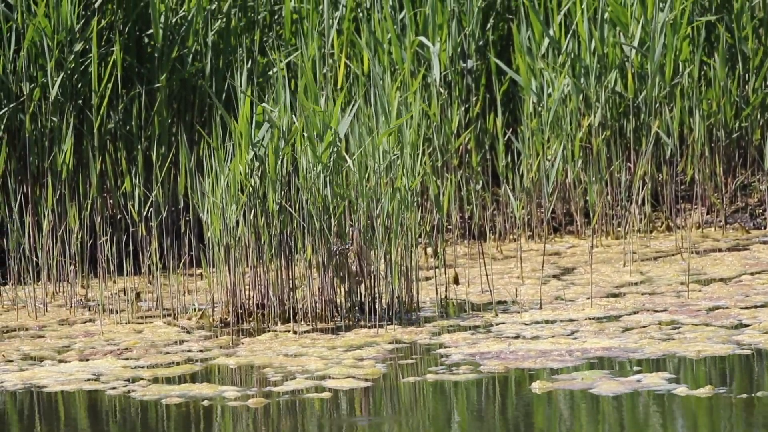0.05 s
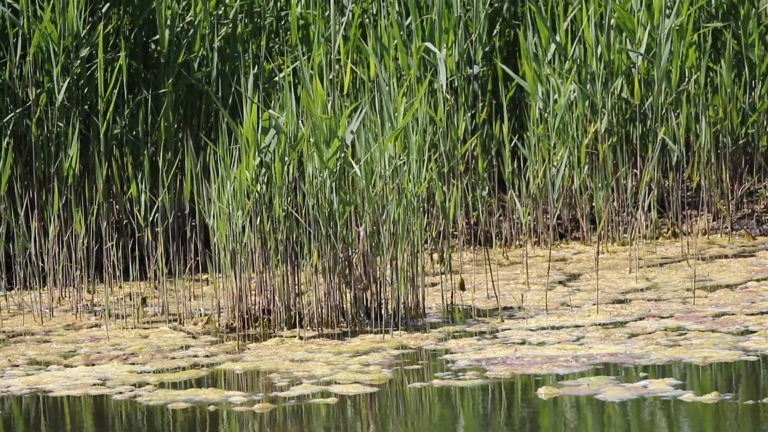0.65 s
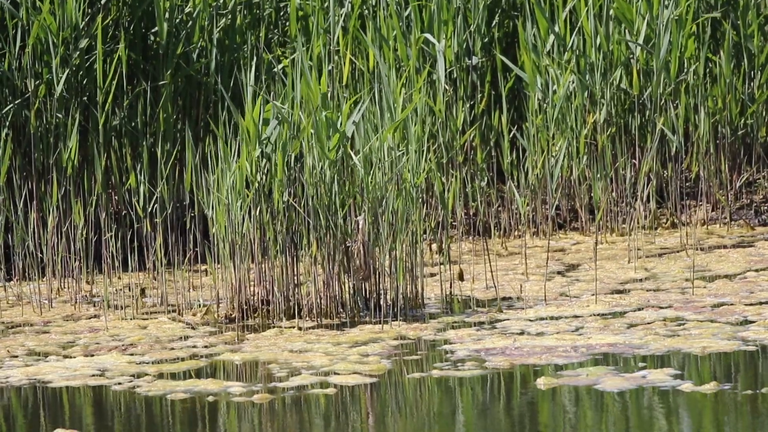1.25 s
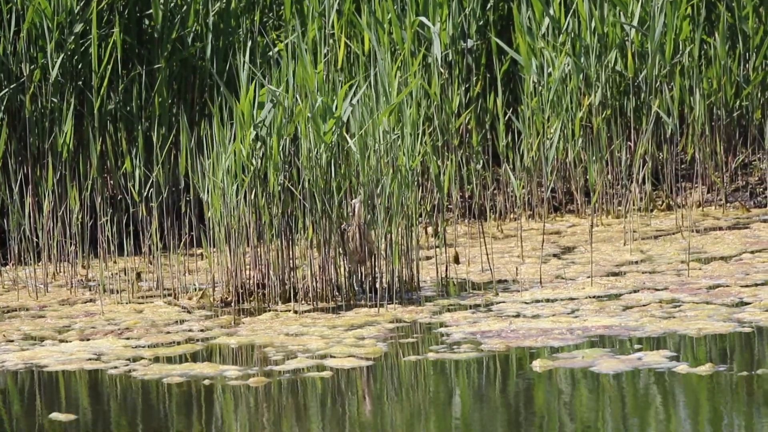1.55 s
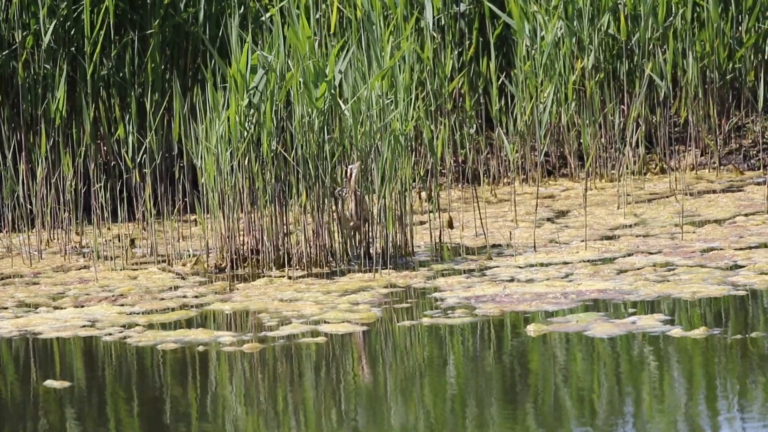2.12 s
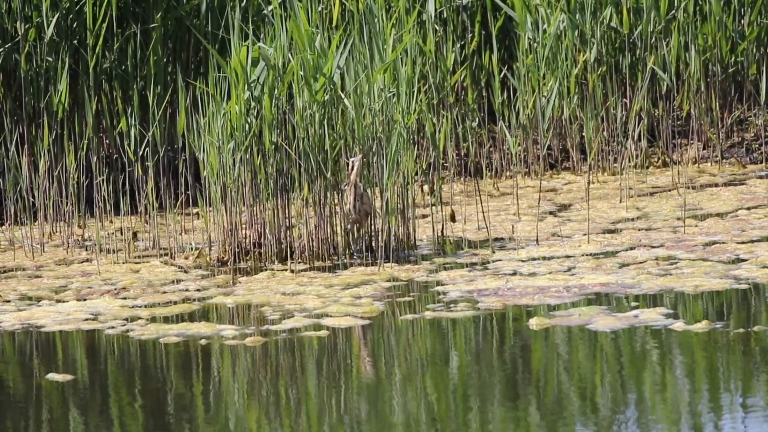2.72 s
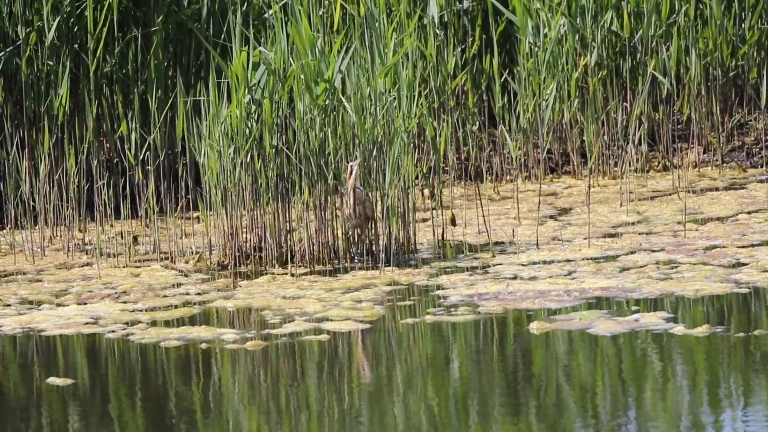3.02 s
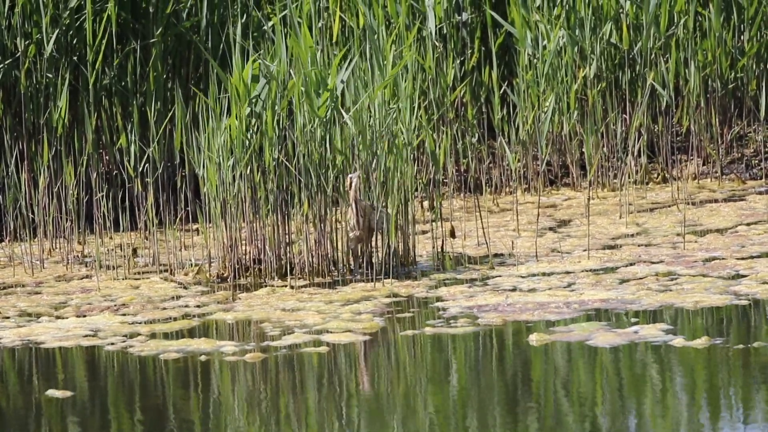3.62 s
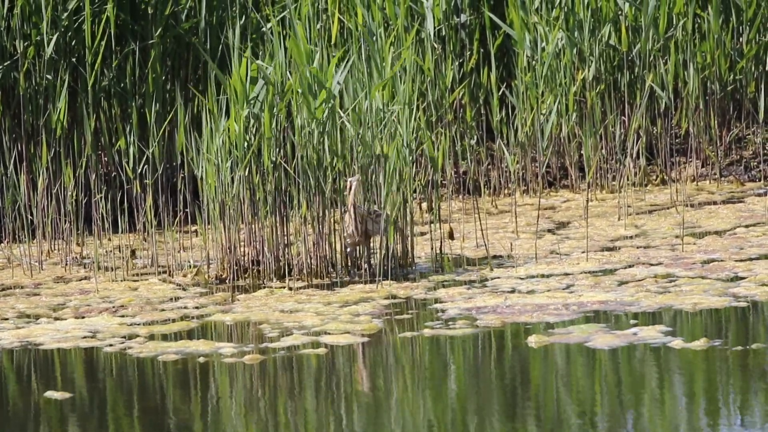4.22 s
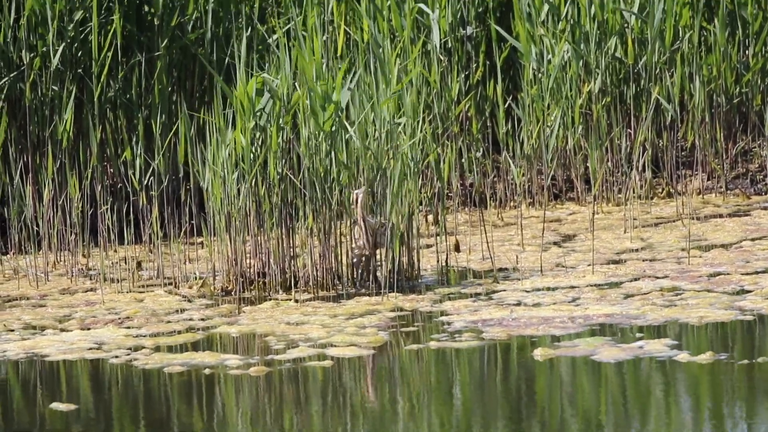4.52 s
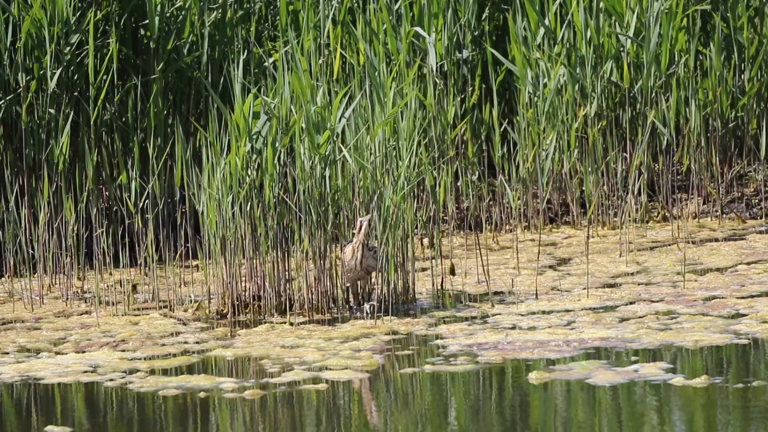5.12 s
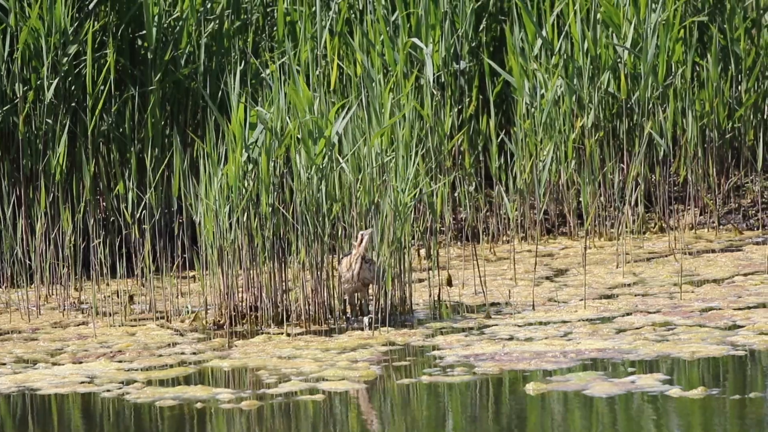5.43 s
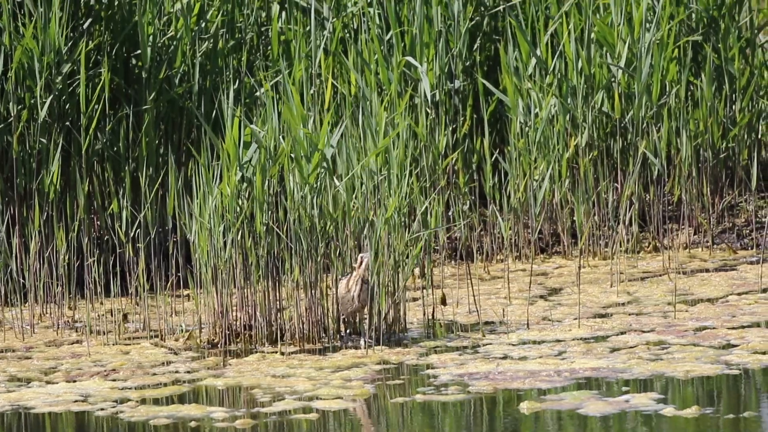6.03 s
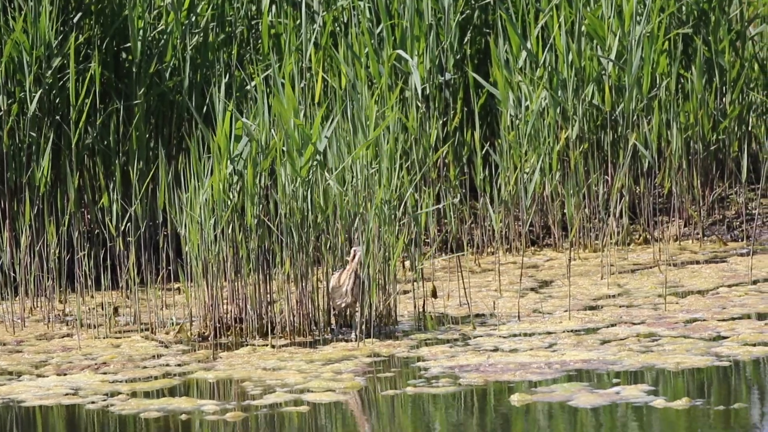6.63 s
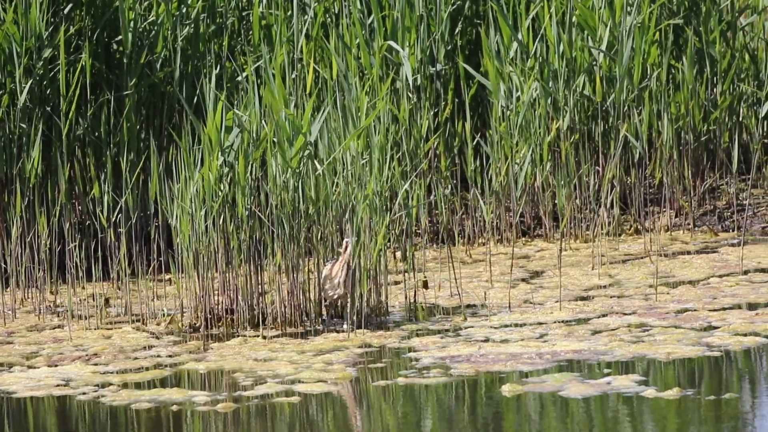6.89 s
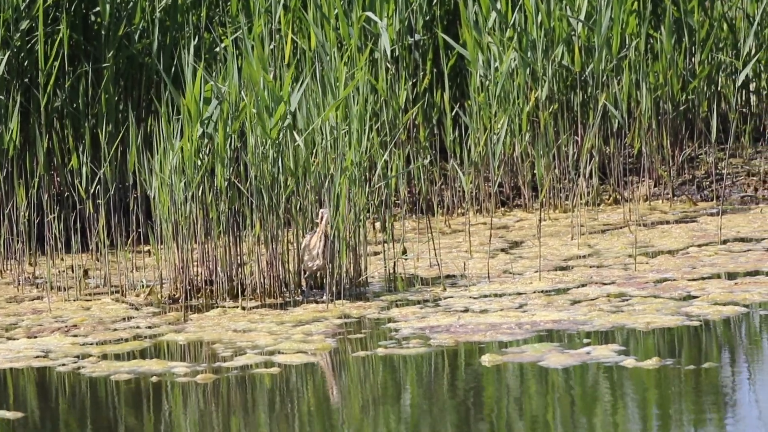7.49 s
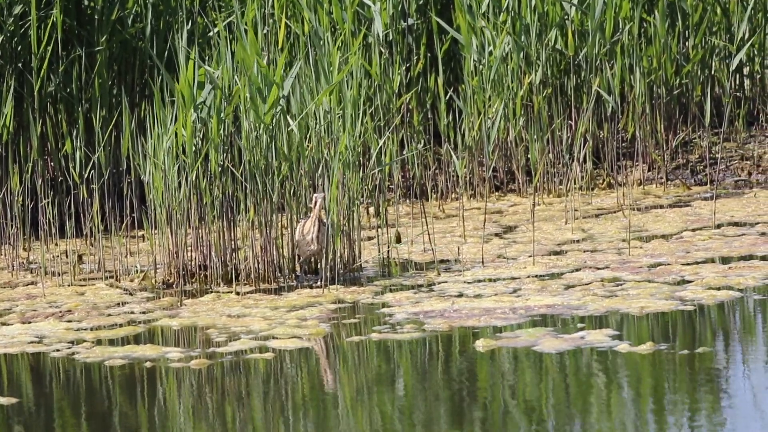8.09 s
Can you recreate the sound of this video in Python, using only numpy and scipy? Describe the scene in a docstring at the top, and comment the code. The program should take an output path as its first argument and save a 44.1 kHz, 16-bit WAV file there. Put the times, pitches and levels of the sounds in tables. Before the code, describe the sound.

Beside a reedy pond, wind rumbles and thumps on a hand-held microphone, with a few light ticks from the grip at the start. Small birds chirp, whistle and trill faintly from the reeds, one nearer bird repeating a high, falling slur. The gusts peak around three seconds, then come in shorter puffs. A calmer stretch leaves sharp chips and distant pips over soft hiss before a last fluttering breeze.

```python
"""Beside a reedy pond, on one hand-held camera microphone: a soft rush of air and far, scratchy chatter.
At once gusts rumble across the microphone port and the camera body ticks in the grip. A warbler's
flourish, thin whistles and trills carry from the reeds; from 1 s a nearer bird slurs with both sides
of its syrinx. A see-saw call and a twitter lead to the hardest gust, near 3 s. The grip creaks again
just after 4 s; then come two sharp chips, far pips and, from 7.3 s, a last breeze in even puffs."""
import sys
import numpy as np
from scipy import signal
from scipy.fft import rfft, irfft, next_fast_len
from scipy.io import wavfile
from scipy.ndimage import uniform_filter1d, map_coordinates

SR = 44100
rng = np.random.default_rng(int(sys.argv[2]) if len(sys.argv) > 2 else 0)


def pcm_store(signal):
    """Save signal as 16-bit PCM."""
    levels = np.round(np.clip(np.atleast_2d(signal), -1, 1) * 32767)
    wavfile.write(sys.argv[1], SR, levels.astype(np.int16).T)


N = 368235


def amp(db):
    """Decibels to gain."""
    return 10 ** (np.asarray(db) / 20)


def unit(x):
    """Scale to rms 1."""
    return x / np.sqrt(np.mean(x ** 2) + 1e-20)


def wobble(rate, size=N):
    """A smooth random curve, rate knots a second."""
    knots = rng.standard_normal(int(size * rate / SR) + 4)
    return map_coordinates(knots, [np.arange(size) * rate / SR])


def filtered(x, response):
    """Filter x by a response given as a function of frequency."""
    size = next_fast_len(N + SR // 2)
    return irfft(rfft(x, size) * response(np.fft.rfftfreq(size, 1 / SR)), size)[:N]


def coloured(x, spectrum):
    """Shape x by (frequency [Hz], gain [dB]) points on a log axis."""
    points_hz, db = np.transpose(spectrum)
    return filtered(x, lambda hz: amp(np.interp(np.log(hz + 1), np.log(points_hz), db)))


def add(track, s, sound):
    """Mix a sound into the track at time s."""
    part = track[max(round(s * SR), 0):][:len(sound)]
    part += sound[:len(part)]


def tone(hz):
    """A sine that follows a pitch curve."""
    return np.sin(2 * np.pi * np.cumsum(hz) / SR)


def arch(u, order):
    """Swell and fade of a note as u runs from 0 to 1; low orders are fuller."""
    return np.abs(np.sin(np.pi * u)) ** order


def swells(rows, rise_s, fall_s):
    """Gain of (time [s], length [s], level [dB]) events that rise, hold and die; they add in power."""
    t, power = np.arange(N) / SR, np.zeros(N)
    for s, length, db in rows:
        fade = np.maximum(s - t, 0) / rise_s + np.maximum(t - s - length, 0) / fall_s
        power += (amp(db) * np.exp(-fade)) ** 2
    return np.sqrt(power)


# the open air over the pond: (frequency [Hz], gain [dB])
AIR_SPECTRUM = [(20, -5), (64, 2), (150, -3), (560, -0.5), (680, -4.5), (1000, -4), (1200, -9), (1400, -5),
                (1600, -10), (2500, -11), (3600, -14), (5200, -18), (7900, -15), (15500, -27.5)]
def air(level_db=-52.5):
    """Distant, steady rush and hiss."""
    return amp(level_db) * unit(coloured(rng.standard_normal(N), AIR_SPECTRUM))


# bouts of a warbler far off in the reeds: (time [s], length [s], level [dB])
SONG_BOUTS = [(0, 0.63, -59), (.8, 0.21, -61), (1.15, 0.17, -62.5), (3.45, 1.5, -65), (5.07, 0.42, -59),
              (5.7, .27, -61.5), (6.1, 0.15, -60.5), (8.08, 0.3, -65)]
def chatter(centre_hz=3050, spread=0.15, slide=0.1125, rasp_hz=220, edge_s=0.02, between_db=-70,
            count=220):
    """Far off, quick scratchy syllables run into one another, louder in bouts."""
    out, u = np.zeros(N), np.linspace(0, 1, SR // 20)
    for s, (height, slope) in zip(np.linspace(0, N / SR, count), rng.standard_normal((count, 2))):
        glide_hz = centre_hz * np.exp(spread * height + slide * slope * (u - .5))
        hz = glide_hz + rasp_hz * wobble(396.7, len(u))
        add(out, s + rng.uniform(0, .04), arch(u, order=1) * tone(hz))
    return np.hypot(swells(SONG_BOUTS, edge_s, edge_s), amp(between_db)) * unit(out)


GUST_RISE_S, GUST_FALL_S, CALM_DB = .016, .028, -60  # time constants; the breeze between gusts
# rumble at the port in a moderate gust: (frequency [Hz], gain [dB])
RUMBLE_SPECTRUM = [(15, -19), (60, 1), (110, 2.5), (175, -1.5), (250, -12), (350, -21.5), (500, -24.5),
                   (800, -55), (1300, -68)]
# gusts right on the microphone: (time [s], length [s], level [dB])
MIC_GUSTS = [(0.02, 0.57, -26), (.6, .31, -22), (1.02, 0.033, -26.5), (1.18, 0.34, -33.5), (1.73, 1.0, -25),
             (1.92, 0.12, -19), (2.26, .22, -20.5), (2.75, 0.39, -18), (3.18, 0.097, -26.5),
             (3.43, 0.072, -30), (3.69, 0.095, -39), (4.04, 0.4, -40.5), (4.22, 0.036, -24),
             (4.6, 0.043, -26.5), (4.73, 0.29, -33), (5.5, 0.083, -36.5), (6.5, 0.48, -52.5),
             (6.97, .28, -41), (8.07, 0.082, -28)]
def wind(level_db=0.5, moderate_db=-22.5, hurry=.24, puff_db=10.5, flutter_start_s=7.33,
         flutter_gap_s=.095, flutter_s=.02, flutter_db=-33, flutter_edge_s=.008, count=11):
    """Eddies sweep past the port in puffs: the faster the air, the louder and higher it rumbles."""
    puffs_db = puff_db * np.tanh(.5 * wobble(32) + .3 * wobble(110))  # puffs within a gust
    flutter = [(flutter_start_s + k * flutter_gap_s - flutter_s / 2, flutter_s, flutter_db)
               for k in range(count)]  # the even puffs of the last breeze
    gusts = swells(MIC_GUSTS, GUST_RISE_S, GUST_FALL_S)
    force = np.hypot(gusts, swells(flutter, flutter_edge_s, flutter_edge_s))
    force_db = 20 * np.log10(force + amp(CALM_DB))
    speed = amp(hurry * (force_db + puffs_db - moderate_db))
    eddies = unit(coloured(rng.standard_normal(N), RUMBLE_SPECTRUM))
    pressure = map_coordinates(eddies, [np.cumsum(speed)], mode="mirror")
    return amp(force_db + level_db) * unit(amp(puffs_db)) * pressure


def eddy(db, hz, phase, order=3, pitch_scale=0.86):
    """One brief thump of air; the higher its frequency, the shorter it is."""
    t = np.arange(-SR // 30, SR // 30) / SR
    swing = np.hanning(len(t)) * (1 - 2j * np.pi * hz * t * pitch_scale / (order + 1)) ** -(order + 2)
    return amp(db) * np.real(swing * np.exp(1j * phase))


# the strongest eddies to strike the port: (time [s], level [dB], frequency before pitch_scale [Hz])
STRONG_EDDIES = [(0.042, -6.5, 133), (0.161, -10.5, 400), (0.177, -8.5, 280), (0.457, -9, 138),
                 (0.616, -5.5, 202), (0.655, -10.5, 230), (0.695, -7.5, 240), (0.753, -12, 145),
                 (0.862, -7.5, 133), (1.19, -13.5, 149), (1.501, -13.5, 165), (1.563, -13, 233),
                 (1.772, -11, 230.7), (1.821, -11.5, 240), (1.935, -6.5, 207), (1.952, -5, 221.9),
                 (2.023, -7, 273), (2.044, -8, 240), (2.274, -8, 169), (2.387, -5.5, 148), (2.418, -6, 297),
                 (2.465, -7.5, 310), (2.773, -4.5, 113), (2.807, -5.5, 216), (2.917, 0, 203),
                 (2.977, -2, 270), (3.042, -8, 324), (3.086, -5, 225), (4.133, -17.5, 238),
                 (4.22, -10.5, 161), (4.733, -12.5, 202), (4.799, -12, 200), (4.901, -10, 138),
                 (4.926, -7, 148), (4.977, -2.5, 294), (4.991, -4.5, 203), (7.323, -20.5, 131),
                 (7.47, -10.5, 140), (7.48, -6, 191), (8.111, -17.5, 190)]
def buffets(lesser_db=8, scatter_db=3, lesser_hz=175, hz_per_db=3.0, moderate_db=-26.0, count=125):
    """Strong eddies thump the microphone amid lesser ones that grow and quicken with the gust."""
    out, lesser = np.zeros(N), []
    gust_db = 20 * np.log10(swells(MIC_GUSTS, GUST_RISE_S, GUST_FALL_S) + amp(CALM_DB))
    times = (np.arange(count) + rng.random(count)) * (N - 1) / count / SR
    for s, (strength, height) in zip(times, np.clip(rng.standard_normal((count, 2)), -2, 1)):
        db = gust_db[int(s * SR)]
        hz = (lesser_hz + hz_per_db * (db - moderate_db)) * np.exp(0.32 * height)
        lesser.append((s, db + lesser_db + scatter_db * strength, hz))
    for s, db, hz in lesser + list(STRONG_EDDIES):
        swing = eddy(db, hz, rng.uniform(0, 2 * np.pi))
        add(out, s - len(swing) / SR / 2, swing)
    return out


# air tearing at the rim of the microphone port: (frequency [Hz], gain [dB])
RASP_SPECTRUM = [(350, -2.5), (700, 1.5), (1150, -9.5), (1600, -22.5), (2200, -31), (3000, -59)]
def port(pressure, rasp_db=-46):
    """The wind's pressure, plus a brief crackle where its fastest swings tear at the rim."""
    rush = np.abs(uniform_filter1d(np.gradient(pressure) ** 2, size=SR // 130))
    return pressure + amp(rasp_db) * unit(coloured(rush * rng.standard_normal(N), RASP_SPECTRUM))


# ticks of the camera body, right at the microphone: (time [s], level [dB])
GRIP_TICKS = [(0.03, -26), (.066, -30), (.078, -34), (.167, -32), (.195, -29), (3.532, -43.5), (4.22, -31),
              (4.256, -30), (4.282, -34), (4.351, -31), (4.395, -32), (4.42, -42)]
# fine slips of the hand: (time [s], length [s], level [dB])
GRIP_RUBS = [(2.5, .1, -56.5), (4.21, 0.315, -53)]
# the bright edge of ticks and slips: (frequency [Hz], gain [dB])
SNAP_SPECTRUM = [(1000, -16), (4000, -21), (7500, 0.5), (11500, -2.5), (15500, -12)]
# low modes of the case: (frequency [Hz], width [Hz], gain [dB])
CASE_MODES = [(1790, 380, 13.5), (3520, 1070, 9.5), (4200, 1300, 7.5)]
def handling(tick_db=-5, knock_db=-38, t60=0.019, slips_per_s=600, slip_knock=0.66, rub_edge_s=.03):
    """The grip sticks and slips: bright ticks that all knock the plastic case about equally."""
    def case(hz):
        return sum((-1) ** k * amp(db) * 1j * hz * width / (centre ** 2 - hz ** 2 + 1j * hz * width)
                   for k, (centre, width, db) in enumerate(CASE_MODES))

    snaps, knocks, t = np.zeros(N), np.zeros(N), np.arange(SR // 50) / SR
    for s, db in GRIP_TICKS:
        burst = amp(-60 * t / t60) * rng.standard_normal(len(t))
        add(snaps, s, amp(db + tick_db) * burst)
        add(knocks, s, amp(knock_db) * burst)
    grains = unit((rng.random(N) < slips_per_s / SR) * rng.standard_normal(N))
    slips = swells(GRIP_RUBS, rub_edge_s, rub_edge_s) * grains
    return coloured(snaps + slips, SNAP_SPECTRUM) + filtered(knocks + slip_knock * slips, case)


# a warbler's phrase, back in the reeds:
# (offset [s], length [s], start [Hz], end [Hz], relative level [dB], beat rate [Hz], swing [Hz])
FLOURISH_NOTES = [(0, .073, 3250, 3280, 2.5, 96, 184), (0.153, 0.02, 2950, 3600, 10, 130, 60),
                  (0.165, .035, 3230, 2510, 0.5, 78, 328), (0.203, .032, 3230, 4150, -4, 116, 250),
                  (0.25, .027, 5400, 4340, 5, 170, 300), (0.268, .042, 4740, 5450, 0, 110, 620),
                  (0.311, 0.026, 5550, 5590, 2.5, 130, 80)]
# each time it is sung: (time [s], level [dB], time stretch [ratio])
FLOURISH_CALLS = [(.187, -46, 1.0), (6.128, -51, 1.08)]
def flourishes():
    """One set phrase of buzzes that climbs at its end, sung faster or slower."""
    return trills([(s + stretch * at, stretch * length, start, end, db + note_db, rate, swing)
                   for s, db, stretch in FLOURISH_CALLS
                   for at, length, start, end, note_db, rate, swing in FLOURISH_NOTES])


# single clear notes from the far reeds:
# (time [s], length [s], start [Hz], middle [Hz], end [Hz], level [dB])
FAR_WHISTLES = [(.44, 0.19, 1580, 1795, 1810, -51), (.59, 0.054, 4670, 4130, 3400, -54),
                (2.496, .04, 4800, 4720, 4430, -54), (2.964, 0.017, 5364, 5700, 5930, -56),
                (4.824, 0.045, 5854, 5000, 4544, -55), (4.947, 0.077, 5100, 3600, 3670, -50.5),
                (5.091, 0.03, 3920, 4030, 4270, -47), (5.275, 0.053, 3530, 4020, 4210, -53),
                (5.595, 0.026, 4740, 4750, 5000, -53.5), (5.784, 0.055, 3850, 3300, 3060, -52),
                (5.962, .019, 2780, 2940, 2980, -48.5)]
def whistles(notes, level_db=-0.5, waver=0.004, flutter_db=2.0, effort_db=3):
    """Pure notes that bend through three pitches, pressed harder at their high end."""
    out = np.zeros(N)
    for s, length, start, middle, end, db in notes:
        u = np.linspace(0, 1, int(length * SR))
        bend_hz = np.polyval(np.polyfit([0, .5, 1], [start, middle, end], 2), u)
        hz = bend_hz * (1 + waver * wobble(443, len(u)))
        effort = effort_db * np.sign(end - start) * (2 * u - 1)
        gain = amp(db + level_db + effort + flutter_db * wobble(168, len(u)))
        add(out, s, gain * arch(u, order=.5) * tone(hz))
    return out


# single trills and buzzes from the far reeds:
# (time [s], length [s], start [Hz], end [Hz], level [dB], beat rate [Hz], swing [Hz])
FAR_TRILLS = [(.81, .18, 3350, 3150, -55, 51, 416), (3.008, .07, 4200, 4030, -51.5, 110, 100),
              (3.513, .155, 5100, 4605, -49, 61, 90), (4.582, 0.055, 3350, 2928, -46, 39, 293),
              (5.123, 0.027, 3850, 3730, -45, 130, 204), (6.019, 0.038, 4870, 4770, -50, 79, 198.4),
              (7.42, .175, 2705, 2365, -51, 30, 50), (7.738, 0.074, 4150, 4033, -50, 150, 100),
              (8.185, 0.17, 5040, 4690, -54.5, 46, 70.1)]
def trills(notes, pulsing=0.69, unevenness=0.117, rough_hz=55):
    """Pitch and loudness beat together, each beat loudest on its way down."""
    out = np.zeros(N)
    for s, length, start, end, db, rate, swing in notes:
        u = np.linspace(0, 1, int(length * SR))
        beat = 2 * np.pi * (u * length * rate + unevenness * wobble(44.0, len(u)))
        hz = start + (end - start) * u + swing * np.sin(beat) + rough_hz * wobble(492, len(u))
        pulse = 1 - pulsing * (1 + np.cos(beat)) / 2
        add(out, s, amp(db) * arch(u, order=.5) * pulse * tone(hz))
    return out


# the slurred call, near the microphone: (time [s], slide level [dB], closing note level [dB])
SLUR_CALLS = [(1.04, -52, -45.5), (1.566, -41.5, -42), (3.403, -43, -42.5), (3.948, -45, -42.5)]
def slurs(slide_s=0.11, slide_hz=(6480, 4780), grow_db=17, gap_db=-14, rough_hz=55,
          beat_rate=59, first_flick_s=.049, flick_hz=600,
          low_hz=4120, low_rise_hz=300, low_db=-3, close_s=0.057, close_hz=(4520, 4140)):
    """One side of the syrinx slides down, taking turns with the lower, which holds the closing note."""
    out, t = np.zeros(N), np.arange(int(slide_s * SR)) / SR
    u, v = t / slide_s, np.linspace(0, 1, int(close_s * SR))  # progress of slide and closing note
    beat = (t - first_flick_s) * beat_rate
    flick = ((beat > 0) & (beat < 4)) * np.exp(-(beat % 1) / .25)  # four upward jumps of pitch
    low_beat = beat + .7  # the lower side leads each flick
    low_turn = ((low_beat > 0) & (low_beat < 4)) * arch(low_beat, order=2)
    swell_db = grow_db * np.minimum(t / first_flick_s - 1, 0)
    swell = amp(swell_db + gap_db * low_turn ** 2) * arch(u, order=.25)
    for s, db, close_db in SLUR_CALLS:
        upper_hz = np.interp(u, [0, 1], slide_hz) + flick_hz * flick + rough_hz * wobble(507, len(t))
        upper = amp(db) * swell * tone(upper_hz)
        lower = amp(close_db + low_db) * u * low_turn * tone(low_hz + low_rise_hz * (low_beat % 1 - .5))
        add(out, s, amp(wobble(103, len(t))) * (upper + lower))
        fall_hz = np.interp(v ** 0.76, [0, 1], close_hz) + rough_hz * wobble(507, len(v))
        closing = amp(close_db) * (1 - v / 2) * arch(v, order=.3) * tone(fall_hz)
        add(out, s + slide_s - .004, closing)
    return out


# a near bird's see-saw call:
# (offset [s], length [s], start [Hz], middle [Hz], end [Hz], relative level [dB])
SEESAW_NOTES = [(0, 0.066, 4160, 4780, 5250, -7.5), (0.056, 0.079, 4090, 3896, 3770, -1)]
# each time it is sung: (time [s], level [dB])
SEESAW_CALLS = [(2.122, -38.5), (4.625, -36.5)]
def seesaws():
    """The same two whistled notes in every call, one rising, one falling."""
    return whistles([(s + at, length, start, middle, end, db + note_db)
                     for s, db in SEESAW_CALLS
                     for at, length, start, middle, end, note_db in SEESAW_NOTES])


def twitter(start_s=2.619, gap_s=.066, level_db=-50.5, count=4,
            buzz_s=0.055, buzz_hz=(4620, 4130), beat_rate=190, swing_hz=280,
            flick_s=0.023, flick_hz=(4940, 5245, 5550), flick_db=-3):
    """Farther off, falling buzzes at an even pace, each linked to the next by a thin rising flick."""
    starts = start_s + gap_s * np.arange(count)
    buzzes = [(s, buzz_s, *buzz_hz, level_db, beat_rate, swing_hz) for s in starts]
    flicks = [(s - flick_s, flick_s, *flick_hz, level_db + flick_db) for s in starts[1:]]
    return trills(buzzes) + whistles(flicks)


# sharp chips from the near reeds: (time [s], level [dB])
NEAR_CHIPS = [(5.272, -44.5), (6.289, -47.5)]
def chips(length_s=0.0044, drop_hz=(9050, 7525, 6000)):
    """Whistles that drop so fast that they sound like clicks."""
    return whistles([(s, length_s, *drop_hz, db) for s, db in NEAR_CHIPS])


# a far bird's runs of even pips: (time [s], level [dB])
FAR_PIP_RUNS = [(6.40, -57.5), (6.745, -57), (7.065, -56.5)]
def pips(gap_s=.062, length_s=0.04, high_hz=3630, low_hz=2450, low_db=-6, grow_db=1.0, count=3):
    """Each run is a few blurred notes sung on two pitches at once, growing louder, no two alike."""
    out, u = np.zeros(N), np.linspace(0, 1, int(length_s * SR))
    for s, db in FAR_PIP_RUNS:
        for k, (height, strength) in enumerate(rng.standard_normal((count, 2))):
            waver = 1 + .015 * height + .035 * wobble(400, len(u))
            voices = tone(high_hz * waver) + amp(low_db) * tone(low_hz * waver)
            add(out, s + k * gap_s, amp(db + grow_db * k + strength) * arch(u, order=1) * voices)
    return out


def reeds(x, t60=0.24, build_s=0.0059):
    """The stems around the pond scatter a short diffuse tail."""
    t = np.arange(SR // 2) / SR
    tail = rng.standard_normal(len(t)) * amp(-60 * t / t60) * (1 - np.exp(-t / build_s))
    return signal.fftconvolve(x, tail / np.linalg.norm(tail))[:N]


def scene(near_echo_db=-15, far_echo_db=-8.5):
    """Near birds reach the microphone almost dry, farther ones with more scatter from the reeds."""
    near = slurs() + seesaws() + chips()
    far = whistles(FAR_WHISTLES) + trills(FAR_TRILLS) + flourishes() + twitter() + pips() + chatter()
    birds = near + far + amp(near_echo_db) * reeds(near) + amp(far_echo_db) * reeds(far)
    return (birds + port(wind() + buffets()) + handling() + air())[None]


def record(dry, low_cut_hz=14, ceiling=.97, top_hz=15750):
    """The camera sheds the deepest rumble, rounds off the highest peaks and cuts the top treble."""
    x = filtered(dry[0], lambda hz: hz ** 2 / (hz ** 2 + low_cut_hz ** 2))
    rounded = x / (1 + (x / ceiling) ** 6) ** (1 / 6)
    return filtered(rounded, lambda hz: hz < top_hz)[None]


dry = scene()
out = record(dry)
pcm_store(out)
```